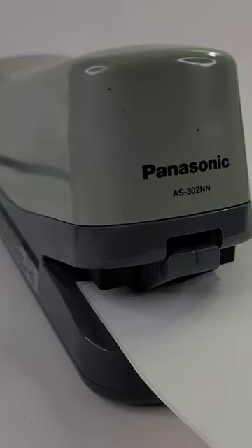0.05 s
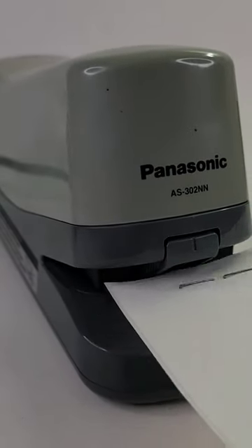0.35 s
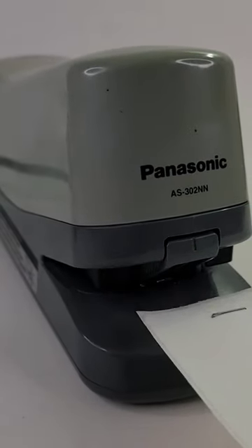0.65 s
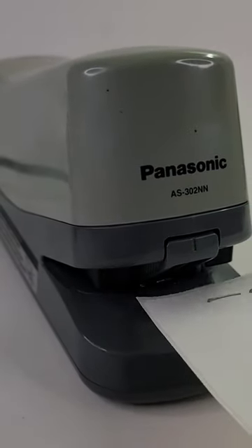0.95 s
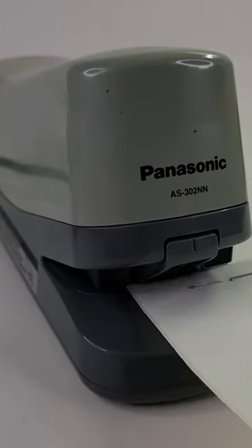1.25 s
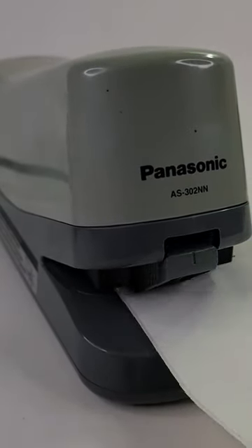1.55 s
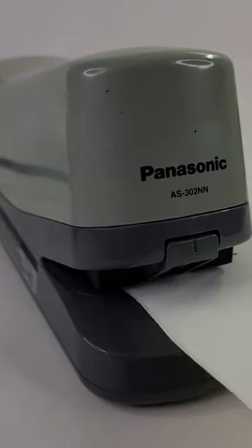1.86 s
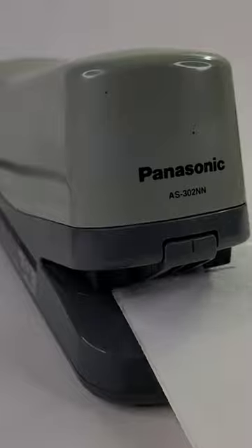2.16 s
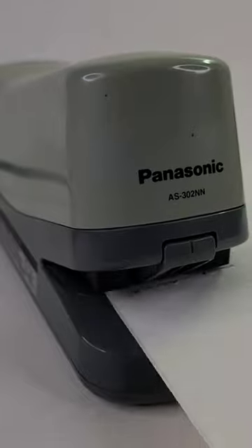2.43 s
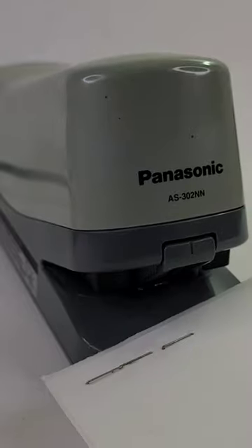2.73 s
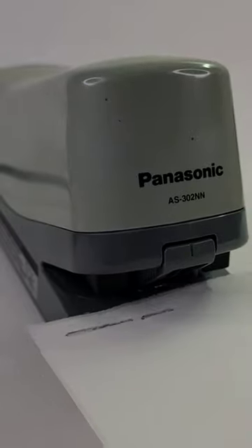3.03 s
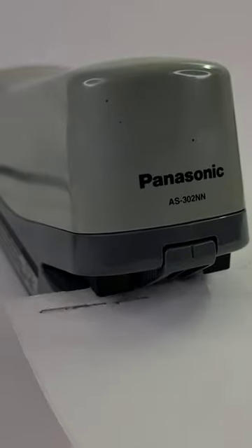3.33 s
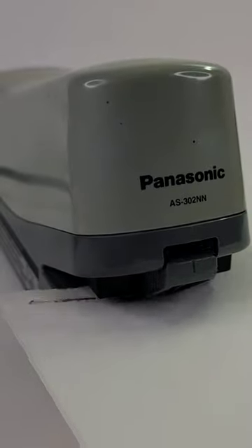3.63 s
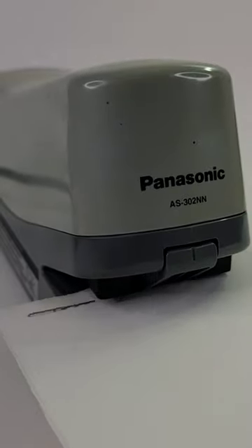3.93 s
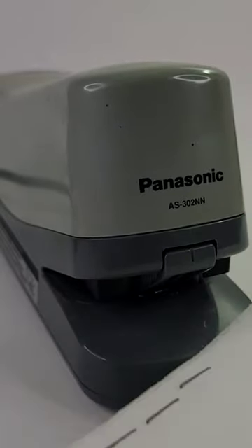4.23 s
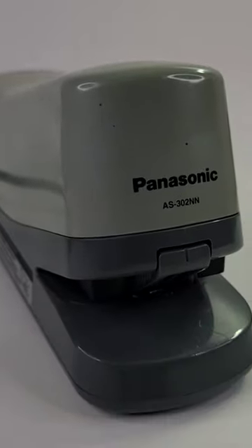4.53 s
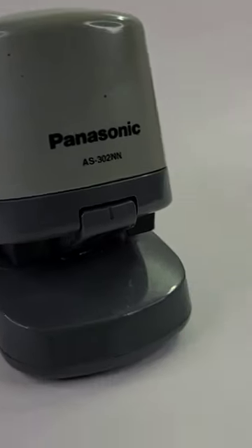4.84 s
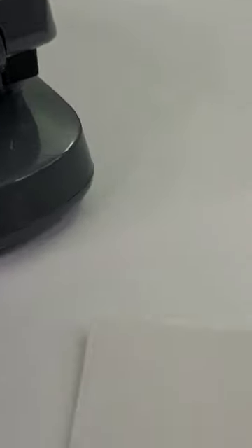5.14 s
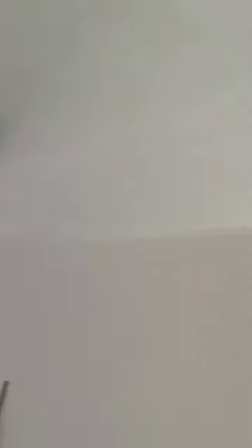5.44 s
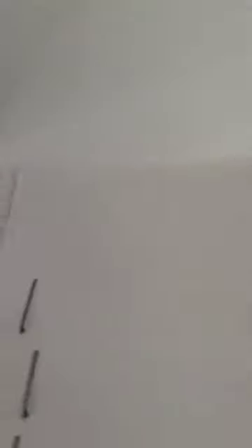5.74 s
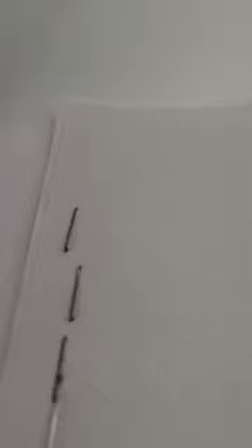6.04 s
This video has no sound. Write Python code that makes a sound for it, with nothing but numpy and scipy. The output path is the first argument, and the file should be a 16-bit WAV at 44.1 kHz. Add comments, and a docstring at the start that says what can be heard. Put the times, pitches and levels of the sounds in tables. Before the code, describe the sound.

Close to the microphone on a desk in a small room, an electric stapler drives three staples into paper. Each short stroke combines a rattling motor whirr, a sharp thudding clack and a strained squeal, ending in a few clicks. In the pauses the paper faintly slides and flicks against the machine, and after the last staple it rustles and crinkles lightly. A low fan hum continues underneath.

```python
"""A sharp clack and a labouring whirr: an electric stapler, already in mid-stroke, drives three staples.
In each stroke a motor spins up through plastic gears, the driver slams the staple home, the motor squeals
against the return spring and the head clatters back up; these forces excite the housing and the desk.
Between staples the sheets slide and crinkle. A fan hums in the small room, and all is heard through
the two microphone ports of a nearby phone."""
import sys
import numpy as np
from scipy import signal
from scipy.fft import rfft, irfft
from scipy.io import wavfile
from scipy.ndimage import uniform_filter1d

SR = 44100
rng = np.random.default_rng(int(sys.argv[2]) if len(sys.argv) > 2 else 0)


def put_to_file(sound):
    """Save the sound as 16-bit audio at rate SR, in the file named by the first command-line argument."""
    columns = np.atleast_2d(sound).T  # one column per channel
    safe = np.clip(columns, -1, 1)
    whole_steps = np.round(safe * 32767)
    wavfile.write(sys.argv[1], SR, whole_steps.astype(np.int16))


N = 268128
T = np.arange(N) / SR

# Strokes; "cam time" is the time since a stroke's start divided by its stretch:
# (start [s], stretch [ratio], clinch delay [s], extra rumble [dB], extra squeal [dB], speed sag [share])
STROKES = [(-.2, 1.008, .027, 1, -1, .02), (1.534, 1.03, .009, 1.5, 0, .06),
           (3.553, 1, .015, -1, -3, -.025)]
# Modes of the plastic housing: (frequency [Hz], width [Hz], gain [dB])
HOUSING_MODES = [(708, 49, 7.5), (917, 100, 4), (1060, 71, 4), (1695, 130, 3.5), (1835, 150, 4),
                 (2280, 110, 3.5), (2640, 160, 6.5), (3350, 410, 7), (3800, 240, 4), (4200, 200, 6.5)]
# Modes of the steel gears and driver: (frequency [Hz], width [Hz], gain [dB])
STEEL_MODES = [(5440, 400, 4), (7000, 800, 5.5)]
LABOUR_S, LABOUR_HALF_S = .295, .045  # centre and half-length of the motor's strain, in cam time


def blows(thud_db=3, knock_db=3, snap_db=2):
    """Impact excitation: each blow thuds into the desk, knocks the housing and snaps the steel parts."""
    # Impact spectra of desk, housing and steel: (frequency [Hz], relative level [dB])
    thud_spectrum = [(30, -42), (80, -7), (160, 3.5), (320, -2.5), (500, -3), (900, -19.5), (3000, -51.5)]
    knock_spectrum = [(100, -23.5), (350, -10.5), (600, 0), (950, 4.5), (1400, -3), (3300, -12.5),
                      (6000, -34)]
    snap_spectrum = [(1500, -1.5), (3500, 0.5), (5500, -1.5), (9000, -3.5), (16000, -6)]
    times, thuds, knocks, snaps = np.transpose(impacts())
    desk = colour(contacts(times, thuds, likeness=.49, fall_s=.0034, clean=.46), thud_spectrum)
    shell = contacts(times, knocks, likeness=.68, fall_s=.0028, clean=.087)
    shell = colour(shell, knock_spectrum, HOUSING_MODES)
    steel = contacts(times, snaps, likeness=.13, fall_s=.0026, clean=.011)
    steel = colour(steel, snap_spectrum, HOUSING_MODES + STEEL_MODES)
    return amp(thud_db) * desk + amp(knock_db) * shell + pan(amp(snap_db) * steel, 11)


def impacts():
    """Cam timing: every turn repeats the same blows, and the clinch follows the driver's."""
    # Slack taken up, head on paper, driver on staple, release, head springing up, end stop, latch:
    # (cam time [s], thud [dB], knock [dB], snap [dB])
    cam_blows = [(.001, -53.5, -35.5, -44.5), (0.157, -23.5, -26.5, -50), (.178, -14.5, -10.5, -18),
                 (.267, -16.5, -14, -26), (.464, -35, -16, -31), (.513, -28, -21, -27),
                 (0.527, -24.5, -24, -19.5)]
    # The staple's legs folding on the anvil: (thud [dB], knock [dB], snap [dB])
    clinch = (-19.5, -13.5, -23)
    # Single knocks and clicks of the mechanism, including the head springing up; the last two rows are bright
    # ticks of the paper's edge as the sheets are pulled out: (time [s], thud [dB], knock [dB], snap [dB])
    clicks = [(.02, -29, -16, -26.5), (.203, -53.5, -23, -34.5), (.266, -39.5, -20, -30),
              (.312, -23.5, -23, -27.5), (1.706, -22.5, -31.5, -31), (1.765, -37, -15.5, -17.5),
              (1.781, -27, -29, -26), (2.0, -30.5, -25, -22.5), (2.018, -33, -18, -33),
              (2.07, -28, -26, -27), (2.274, -54, -35.5, -51.5), (3.734, -23, -11, -19),
              (3.741, -23, -28, -30), (3.795, -55, -33, -30), (3.991, -39, -31, -28),
              (4.146, -60, -55, -36), (4.173, -61, -48, -38)]
    driver_s = max(cam_blows, key=lambda blow: blow[1])[0]
    rows = list(clicks)
    for start, stretch, clinch_s, *_ in STROKES:
        rows += [(start + stretch * s, *levels) for s, *levels in cam_blows]
        rows.append((start + stretch * driver_s + clinch_s, *clinch))
    return [row for row in rows if row[0] >= 0]


def gears(tooth_fall=.81, uneven_db=2, clatter_db=2, rattle_db=-7.2, scrape_db=-5, whine_db=-16):
    """Forced vibration: teeth rattle, scrape and whine at the mesh rate; the body shakes the desk."""
    # Spectra of the gear noises: (frequency [Hz], relative level [dB])
    whine_spectrum = [(300, -22), (430, -3), (560, -4), (700, -4), (1100, -2.5), (2400, -8)]
    rattle_spectrum = [(150, -9.5), (350, -17), (580, -3), (750, -3), (1050, 0), (1300, -4.5), (2600, -12),
                       (4000, -38)]
    scrape_spectrum = [(1500, -30.5), (2900, -4.5), (3600, 0.5), (4400, -3), (6400, -6.5), (8100, -10.5),
                       (10500, -12), (13000, -7.5), (15500, -32.5)]
    rumble_spectrum = [(25, -37.5), (48, -15.5), (68, 3.5), (95, -5), (170, -2.5), (400, -17.5), (900, -46)]
    # Mode of the base, which the whine sweeps through: (frequency [Hz], width [Hz], gain [dB])
    base_modes = [(424, 43, 12)]
    mesh_hz, (force, friction, shake) = motor()
    teeth = np.cumsum(mesh_hz * (1 + .012 * walk(300))) / SR
    tooth_gain = amp(uneven_db * rng.standard_normal(N)[teeth.astype(int)])
    strikes = np.exp(-(teeth % 1) / tooth_fall) * tooth_gain
    strikes = unit(strikes * amp(clatter_db * walk(170)))  # backlash: short irregular bunches
    phase = 2 * np.pi * teeth + .7 * walk(330)
    whine = amp(whine_db + 3 * walk(110)) * np.sin(phase)
    whine = colour((whine * force)[None], whine_spectrum, HOUSING_MODES + base_modes)
    rattle = colour(pair(.6) * strikes * force, rattle_spectrum, HOUSING_MODES)
    scrape = cavity(pair(.27) * strikes * friction, t60_s=.026, shifts_per_s=20)
    scrape = colour(scrape, scrape_spectrum, HOUSING_MODES + STEEL_MODES)
    treble = pan(squeal(teeth) + amp(scrape_db) * scrape, 4)
    rumble = colour(pair(.61) * shake, rumble_spectrum)
    return amp(rattle_db) * rattle + whine + treble + amp(1.5) * rumble


def motor(spin_up_s=.019, switch_off_s=.52):
    """Speed and noise follow the load: returns the mesh rate and rattle, scrape and rumble envelopes."""
    # The gears spin up, sag against the spring, race and coast: (cam time [s], mesh rate [Hz])
    gear_speed = [(0, 0), (.035, 260), (.07, 430), (.11, 625), (.15, 710), (.19, 740), (.243, 720),
                  (.268, 658), (.3, 608), (.33, 568), (.37, 550), (.39, 610), (.412, 700), (.435, 860),
                  (.488, 1120), (.535, 700), (.565, 439.5), (.6, 400), (.7, 0)]
    # Pressing the staple, retracting the driver, winding the spring, passing the top, the spring's push:
    # (cam time [s], half-length [s], rattle gain [dB], scrape gain [dB], rumble gain [dB])
    loads = [(0.189, 0.022, 8.5, 8.5, 12.5), (0.257, 0.033, 3, 4.5, 4.5), (0.344, .046, -1.5, 2.5, 1.5),
             (0.411, 0.014, 1, 5, -3.5), (0.499, 0.051, 2.5, 3.5, 14)]
    # Each for rattle, scrape and rumble; the fade is per second of cam time.
    running_db, growth, fade_db = (-25.5, -33, -42), (.42, .73, .28), (107.5, 164.5, 96.5)
    mesh_hz, envelopes = np.zeros(N), np.zeros((3, N))
    for start, stretch, _, desk_db, _, sag in STROKES:
        cam_s = np.maximum(T - start, 0) / stretch
        spin = 1 - np.exp(-cam_s / spin_up_s)
        coasting = np.maximum(cam_s - switch_off_s, 0)
        slowing = 1 - sag * bell(cam_s, LABOUR_S, LABOUR_HALF_S)
        mesh_hz += np.interp(cam_s, *np.transpose(gear_speed)) * slowing
        rattle, scrape, rumble = sum(np.outer(db, bell(cam_s, s, half)) for s, half, *db in loads)
        for k, load_db in enumerate((rattle, scrape, rumble + desk_db)):
            envelopes[k] += spin ** growth[k] * amp(running_db[k] + load_db - fade_db[k] * coasting)
    return np.maximum(mesh_hz, 0), envelopes


def squeal(teeth, mesh_ratio=3.3, level_db=-30.5, harmonics_db=(-.5, 1, -8), rasp=.25, flutter_db=3):
    """A harmonic series tied to speed: straining against the spring, the motor squeals and falls."""
    labour = swells([(start + LABOUR_S * stretch, LABOUR_HALF_S, level_db + extra_db)
                     for start, stretch, _, _, extra_db, _ in STROKES])
    phase = 2 * np.pi * mesh_ratio * teeth
    sides = np.zeros((2, N))
    for side in sides:
        for k, db in enumerate(harmonics_db, 1):
            side += amp(db + flutter_db * walk(150)) * np.sin(k * (phase + rasp * walk(300)) + walk(60))
    return labour * sides


def freewheel(cam_s=.59, half_s=.05, level_db=-47):
    """Inertia: after the switch-off the rotor spins on briefly and keeps the housing ringing."""
    # Rotor noise: (frequency [Hz], relative level [dB])
    rotor_spectrum = [(400, -13.5), (960, -6.5), (1500, -12), (4300, -8.5), (8000, -39)]
    spin = swells([(start + cam_s * stretch, half_s, level_db) for start, stretch, *_ in STROKES])
    return colour(pair(.46) * spin, rotor_spectrum, HOUSING_MODES)


def cavity(x, t60_s, shifts_per_s, count=4):
    """Modal overlap: close resonances in the housing give a short ring that shifts as the parts move."""
    rings = (rng.standard_normal((count, N)) * np.exp(-np.log(1000) * T / t60_s))[:, :SR // 4]
    shares = np.array([walk(shifts_per_s) for _ in rings])
    shares = shares / np.linalg.norm(shares, axis=0)
    return sum(share * signal.oaconvolve(x, ring[None] / np.linalg.norm(ring), axes=1)[:, :N]
               for share, ring in zip(shares, rings))


def paper(crease_db=1, slide_db=5, grain_db=3, catch_db=1.5, picked_up_s=1.9):
    """Stick-slip friction: fibres catch as the sheets slide; bends crinkle and the edge flicks."""
    # Sheets sliding in and out: (time of peak speed [s], half-length [s], level [dB])
    slides = [(1.5, 0.065, -69.5), (2.45, 0.024, -59.5), (2.67, 0.048, -65), (3.45, 0.07, -66.5),
              (4.42, 0.05, -65.5), (4.6, 0.065, -61), (4.86, 0.094, -64.5), (5.27, 0.034, -66.5),
              (5.8, 0.066, -60), (6.05, 0.035, -62)]
    # The edge flicking against the stapler: (time [s], level [dB])
    edge_flicks = [(2.448, -53.5), (2.578, -42), (3.425, -46), (4.44, -43), (4.449, -39), (4.456, -49),
                   (4.739, -49)]
    # Spectra of the paper noises: (frequency [Hz], relative level [dB])
    slide_spectrum = [(1200, -1.5), (2800, 2), (4300, -1.5), (6500, -4), (8300, -7.5), (14000, -9.5)]
    crinkle_spectrum = [(900, -16.5), (1900, -9.5), (3400, -11), (9000, -36)]
    flick_spectrum = [(1500, -16), (3500, -4), (4900, 2.5), (9000, -10), (16000, -14)]
    # Modes of the bent sheets: (frequency [Hz], width [Hz], gain [dB])
    sheet_modes = [(1930, 600, 14), (3490, 190, 9.5)]
    grain = unit(amp(grain_db * walk(820) + catch_db * walk(35)))
    rustle = (T > picked_up_s) * amp(-75 + 3 * walk(11))
    slide = colour(pair(.074) * grain * np.hypot(swells(slides), rustle), slide_spectrum)
    creases = contacts(*crease_ticks(), likeness=.15, fall_s=.0012, clean=.3)
    creases = colour(creases, crinkle_spectrum, sheet_modes)
    flicks = colour(pair(.19) * bursts(*np.transpose(edge_flicks), fall_s=.0025), flick_spectrum)
    return pan(amp(crease_db) * creases + amp(slide_db) * slide + flicks, 1)


def crease_ticks(jitter_s=.0005, fade_db_per_s=42):
    """Buckling: a bent sheet gives way in a run of ever softer ticks; returns times and levels."""
    # Buckles: (time [s], length [s], tick spacing [s], level [dB])
    buckles = [(3.383, 0.18, .006, -45), (5.443, .005, .013, -39), (5.503, .02, 0.014, -43.5),
               (5.7, .06, .0112, -37.5), (5.951, .045, 0.014, -41.5)]
    ticks = []
    for start, length, gap, db in buckles:
        for age, slip in zip(np.arange(0, length, gap), rng.standard_normal(64)):
            ticks.append((start + age + (age > 0) * jitter_s * slip, db - fade_db_per_s * age))
    return np.transpose(ticks)


def fan(blade_hz=258.2, tone_db=-33.5, rush_db=-43, softer_s=3.8, softer_db=-1.7):
    """Aerodynamic noise: a wavering blade-passing tone, later a little softer, over a rush of air."""
    # Moving air: (frequency [Hz], relative level [dB])
    air_spectrum = [(22, -36.5), (42, -16), (52, -19), (72, -10.5), (100, -20), (140, -11.5), (190, -16.5),
                    (350, -28), (560, -30.5), (1200, -34), (1650, -35), (2100, -42), (3600, -50.5),
                    (7000, -68.5), (15000, -76.5)]
    # Peaks in the rush: (frequency [Hz], width [Hz], gain [dB])
    air_peaks = [(122, 19, 3.3), (183, 24, 5.5), (295.7, 21, 12.9), (761, 5.4, 15)]
    passes = np.cumsum(blade_hz + .73 * walk(10)) / SR
    softer = (1 + np.tanh((T - softer_s) / .13)) / 2
    tone = np.sqrt(2) * np.sin(2 * np.pi * passes) * amp(tone_db + softer_db * softer + .78 * walk(10))
    rush = colour(pair(.52), air_spectrum, air_peaks)
    return pan(tone, -1.3) + pan(amp(rush_db) * rush, -2)


def echoes(x, t60_s, wet_db):
    """Reverberation: a diffuse, exponentially decaying tail, different on each side and weak in bass."""
    tail = rng.standard_normal((2, N)) * np.exp(-np.log(1000) * T / t60_s)
    tail = colour(tail, [(80, -27.5), (300, -15.5), (900, 9), (4000, 10.5), (14000, -6.5)])[:, :SR]
    return x + amp(wet_db) * signal.fftconvolve(x, tail / np.linalg.norm(tail[0]), axes=1)[:, :N]


def contacts(times, db, likeness, fall_s, clean):
    """Energy partition: a contact is one push (share `clean`) and a brief scatter of smaller ones."""
    push = bursts(times, db, 1 / SR / 2) * np.sqrt(fall_s * SR / 2)
    scatter = pair(likeness) * bursts(times, db, fall_s)
    return np.sqrt(clean) * push + np.sqrt(1 - clean) * scatter


def colour(x, spectrum, modes=(), size=8192):
    """Minimum-phase filter of unit power gain: a smooth spectrum with resonances standing on it."""
    f = np.maximum(np.fft.rfftfreq(size, 1 / SR), 1)
    hz, db = np.transpose(spectrum)
    gain = amp(np.interp(np.log(f), np.log(hz), db))
    for centre, width, peak_db in modes:
        gain = gain * amp(peak_db / (1 + (2 * (f - centre) / width) ** 2))
    cepstrum = irfft(np.log(gain))
    causal = 2 * cepstrum[:size // 2] * (np.arange(size // 2) > 0)
    response = irfft(np.exp(rfft(causal, size)))
    return signal.fftconvolve(x, response[None] / np.linalg.norm(response), axes=1)[:, :N]


def pair(likeness, alike_below_hz=350):
    """Partial coherence: noise at two close ports shares a part, and all of the bass."""
    mid, side = rng.standard_normal((2, N))
    side = signal.sosfilt(signal.butter(2, alike_below_hz, "high", fs=SR, output="sos"), side)
    return np.sqrt((1 + likeness) / 2) * mid + np.sqrt((1 - likeness) / 2) * np.array([side, -side])


def bursts(times, db, fall_s):
    """Exponential decay: an envelope that jumps at each time and falls to 1 / e in fall_s."""
    kicks = np.zeros(N)
    np.add.at(kicks, np.clip((np.asarray(times) * SR).astype(int), 0, N - 1), amp(db) ** 2)
    return np.sqrt(signal.lfilter([1], [1, -np.exp(-2 / (fall_s * SR))], kicks + 1e-18))


def swells(rows):
    """Superposed bell envelopes from rows of (time [s], half-length [s], level [dB])."""
    return sum(amp(db) * bell(T, s, half) for s, half, db in rows)


def bell(t, centre_s, half_s):
    """Gaussian rise and fall, 1 at its centre."""
    return np.exp(-((t - centre_s) / half_s) ** 2 / 2)


def walk(rate):
    """Random modulation: glides between `rate` levels a second, with rms 1."""
    hold = max(int(SR / rate), 1)
    return unit(uniform_filter1d(np.repeat(rng.standard_normal(N // hold + 1), hold), hold)[:N])


def pan(x, left_db):
    """Level panning: the left side leads the right by left_db."""
    return x * amp(np.array([[left_db], [-left_db]]) / 2)


def amp(db):
    """Decibels to gain."""
    return 10 ** (np.asarray(db) / 20)


def unit(x):
    """Scale to rms 1."""
    return x / np.sqrt(np.mean(x ** 2))


def scene():
    """Superposition: stapler and paper, reflected by the desk and faintly by the walls, over the fan."""
    near = echoes(gears() + freewheel() + blows() + paper(), t60_s=.12, wet_db=-11.5)
    return amp(1.5) * echoes(near, t60_s=.43, wet_db=-18.5) + fan()


def record(dry, top_hz=15600):
    """Diffraction round the phone delays the right port; the phone rounds peaks and cuts the top."""
    # Lag of the right port: (frequency [Hz], delay [s])
    port_lag = [(500, 0.0001), (1100, 0.00019), (1700, .00029), (8000, 0.000256)]
    f = np.fft.rfftfreq(N, 1 / SR)
    delay_s = np.interp(f, *np.transpose(port_lag))
    right = irfft(rfft(dry[1]) * np.exp(-2j * np.pi * f * delay_s), N)
    lowpass = signal.ellip(8, .2, 80, top_hz, fs=SR, output="sos")
    return signal.sosfilt(lowpass, np.tanh([dry[0], right]))


dry = scene()
out = record(dry)
put_to_file(out)
```